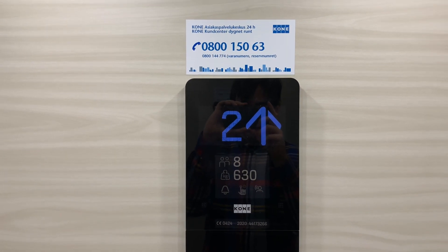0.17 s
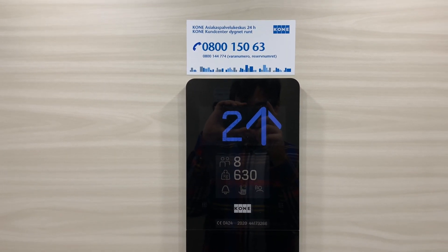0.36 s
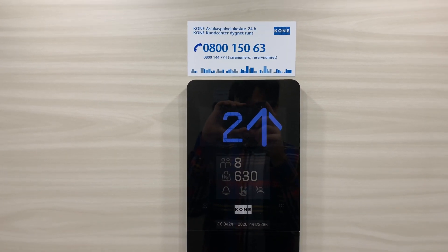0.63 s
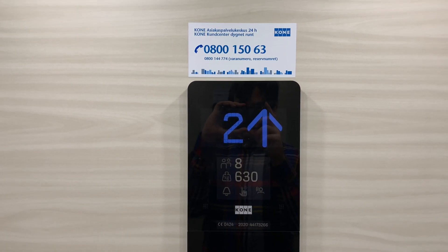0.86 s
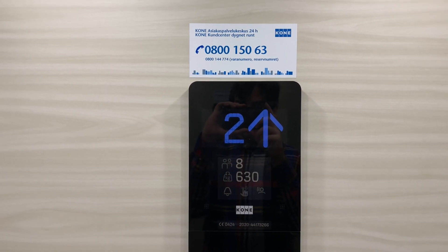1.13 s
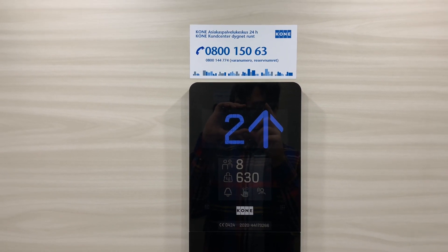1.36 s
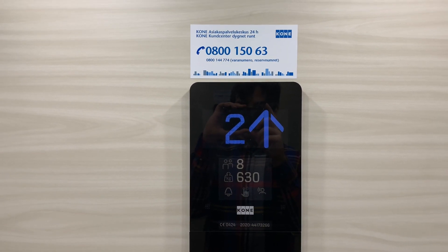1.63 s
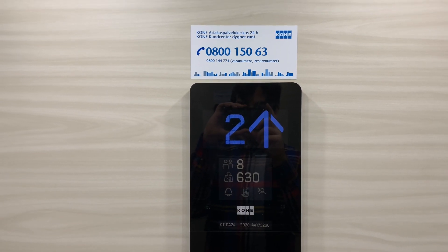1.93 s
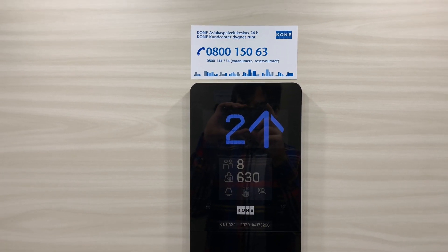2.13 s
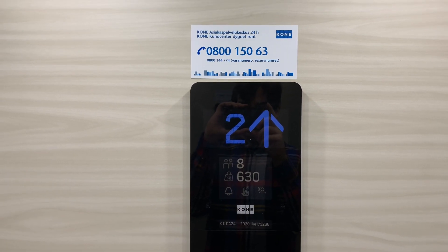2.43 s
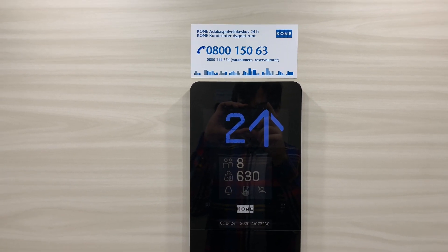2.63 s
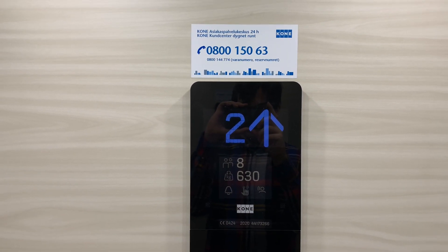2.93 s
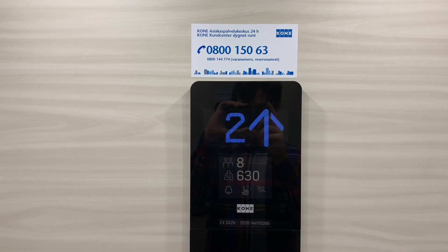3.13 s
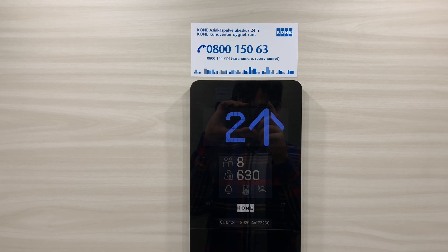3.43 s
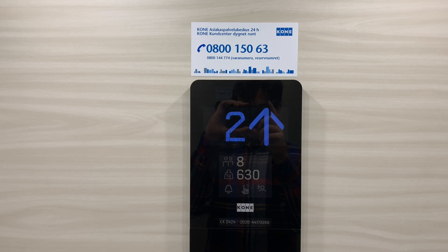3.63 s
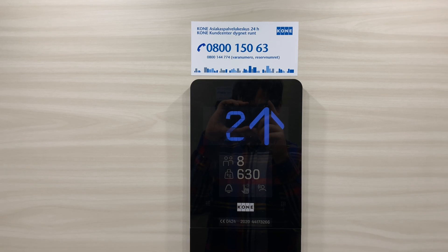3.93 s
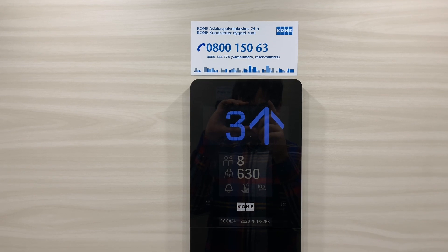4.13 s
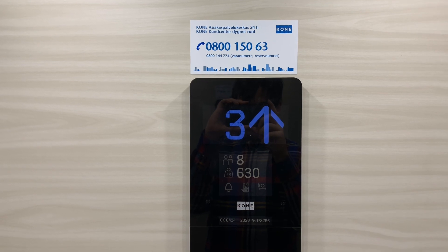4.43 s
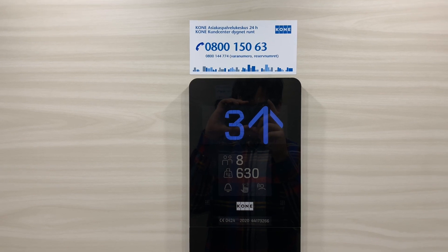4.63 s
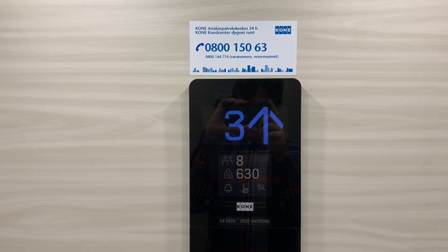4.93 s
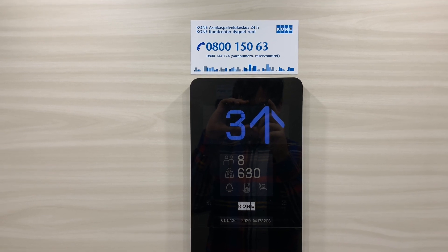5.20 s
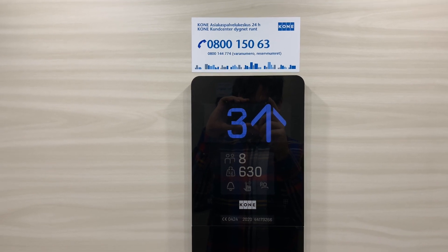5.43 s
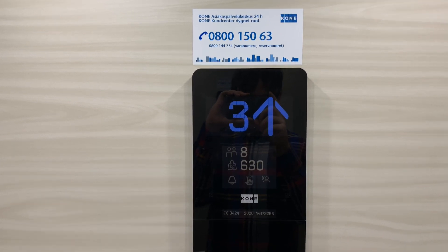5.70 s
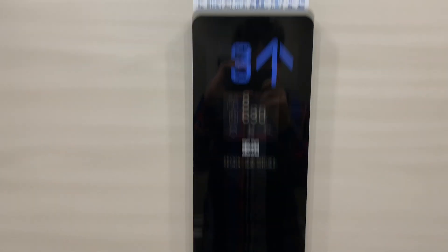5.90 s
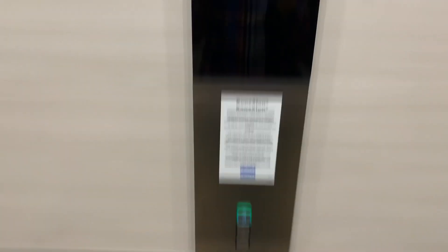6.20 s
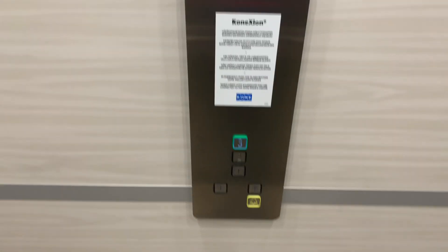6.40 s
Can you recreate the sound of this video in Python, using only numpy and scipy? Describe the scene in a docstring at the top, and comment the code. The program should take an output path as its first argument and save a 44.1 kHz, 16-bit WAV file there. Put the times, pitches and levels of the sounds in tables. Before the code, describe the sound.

Elevator ride heard from within: guide friction with faint whistles gives way to steady motor hum, then sharp switch clicks and muffled knocks.

```python
"""A lift's hoist motor hums through the cabin walls as the car climbs, heard inside at two microphone ports.
The hum, its orders and the drones are wavering sines; rumble, air, ringing panels, a steady hum line and a high
drive whine are shaped noise. For about the first 1.4 seconds a guide scrapes, as friction noise with short
gliding whistles. Brief noise swells make rustles, bumps and click tails; dull knocks are dying modes. Shaft
switches click as the car passes a landing: each is a snap, a ringing housing and dense echoes."""
import sys
import numpy as np
from scipy import signal
from scipy.fft import irfft, next_fast_len
from scipy.io import wavfile
from scipy.ndimage import uniform_filter1d

SR = 44100
rng = np.random.default_rng(int(sys.argv[2]) if len(sys.argv) > 2 else 0)


def generate_wav(signal):
    """Clip the signal to [-1, 1] and save it as 16-bit WAV at the path in sys.argv[1]."""
    frames = np.transpose(np.atleast_2d(signal))
    scaled = np.clip(frames, -1, 1) * 32767
    pcm = np.round(scaled).astype(np.int16)
    wavfile.write(sys.argv[1], SR, pcm)


N = 289296
SIZE, HOP = 2048, 512  # default short-time frame and step, samples

# likeness of the two ports: freq_hz, likeness (-1 opposite to 1 same)
LIKENESS = [(60, .992), (100, .97), (130, .85), (270, .92), (500, .6), (700, .35), (1100, .35),
            (1500, -.45), (1900, -.55), (2400, .3), (3200, .25), (4000, 0), (7000, .2), (8300, -.97),
            (9300, -.95), (10000, .97), (11700, .95), (12700, -.97)]
# lean of the port pair: freq_hz, left_over_right_db
LEAN = [(45, 1), (90, 1.2), (170, .4), (300, 2), (700, 3.5), (1100, 3.5), (1700, 6), (2600, 1), (3300, 1.5),
        (6000, -1.5), (8000, .1)]
# lag of the left port: freq_hz, lag_radians
LAG = [(40, .1), (100, .17), (172, .5), (300, .15), (1000, .25), (1400, 0)]
# modes of rail and cabin frame that colour rumble and scrape: freq_hz, width_hz, peak_db (before scaling)
FRAME_MODES = [(580, 10, 5), (628, 12, 1), (709, 12, 4), (855, 40, 6), (1105, 16, 4), (1590, 40, 2),
               (1832, 29, 4), (2295, 25, 5), (2460, 25, 4), (3077, 30, 3), (3250, 40, 3), (3480, 40, 3),
               (4060, 29, 3)]


def gain_of(db):
    """Amplitude factor of a level in dB."""
    return 10 ** (np.asarray(db) / 20)


def evened(x):
    """A signal scaled to rms 1."""
    return x / np.sqrt(np.mean(x ** 2) + 1e-20)


def read(points, hz):
    """A spectrum table read on a log-frequency axis."""
    f, value = np.transpose(points)
    return np.interp(np.log(hz + 1), np.log(f + 1), value)


def columns(rows, t):
    """Every column of a curve table at the times t."""
    s, *rest = np.transpose(rows)
    return [np.interp(t, s, c) for c in rest]


def grid(size=SIZE, hop=HOP, count=N):
    """Frame times and bin frequencies of short-time spectra."""
    return np.arange(count // hop + 9) * hop / SR, np.fft.rfftfreq(size, 1 / SR)[:, None]


def unit(db, band=True):
    """Gains of a spectrum, scaled to power 1 within a band of each frame."""
    gain = gain_of(db)
    return gain / np.sqrt((gain ** 2 * band).sum(0))


def random_grid(t, hz):
    """Independent random values for every bin and frame."""
    return rng.standard_normal((len(t), len(hz))).T


def smoothed(values, bins, frames):
    """A time-frequency grid averaged over bins and frames, then scaled to rms 1."""
    return evened(uniform_filter1d(uniform_filter1d(values, bins, 0), frames, 1))


def peaks_db(modes, hz):
    """The peaks that a set of modes raises in a spectrum."""
    return sum(db / (1 + (2 * (hz - f) / w) ** 2) for f, w, db in modes)


def apart_at(hz):
    """Phase between the ports, in radians, that gives a sine their likeness."""
    return np.arccos(np.clip(read(LIKENESS, hz), -1, 1))


def ports(left, other, hz):
    """Two partly alike spectra for the two ports, with the lean and lag of the housing."""
    same, lean = np.clip(read(LIKENESS, hz), -1, 1), gain_of(read(LEAN, hz) / 2)
    right = same * left * np.exp(1j * read(LAG, hz)) + np.sqrt(1 - same ** 2) * other
    return np.array([left * lean, right / lean])


def noise(gain, hz, hop=HOP):
    """Diffuse noise from random short-time spectra; a frame of power 1 gives rms 1 before the lean."""
    a, b, c, d = rng.standard_normal((*gain.T.shape, 4)).T
    size = 2 * len(hz) - 2
    spectra = ports(a + 1j * b, c + 1j * d, hz) * gain
    sound = signal.istft(spectra, nperseg=size, noverlap=size - hop)[1][:, :N]
    return sound * np.sqrt(3 * size / 8 / hop)  # makes up for the overlapping windows


def drift(span):
    """Slow chance of rms 1, averaged twice over a span of samples."""
    return evened(uniform_filter1d(uniform_filter1d(rng.standard_normal(N), size=span), size=span))


def tone(hz, db, waver_hz, throb_db, apart=0, span=2500):
    """A sine that follows curves, wavering in pitch and throbbing in level, with the lean and lag of the ports."""
    phase = 2 * np.pi * (np.cumsum(hz + waver_hz * drift(span)) / SR + rng.random())
    lean, lag = gain_of(read(LEAN, np.mean(hz)) / 2), read(LAG, np.mean(hz)) + apart
    level = np.sqrt(2) * gain_of(db + throb_db * drift(span))
    return level * np.array([lean * np.sin(phase - lag), np.sin(phase) / lean])


def motor():
    """Hum orders and rope bounce rise in pitch with the car's speed; wall drones and a buzz keep their own pitch."""
    # swelling levels of the hum and its second and third orders, before the start fade: time_s, level_db
    hum_curve = [(0.8, -35), (0.85, -49), (1.06, -39), (1.1, -28.5), (1.59, -42), (1.83, -32), (1.92, -53),
                 (2.0, -31), (2.07, -39), (2.16, -27.5), (2.31, -45), (2.34, -31.5), (2.95, -26.5),
                 (3.11, -39.5), (3.35, -34.5), (3.61, -42.5), (3.8, -30), (4.04, -30), (4.1, -46),
                 (4.17, -35.5), (4.41, -28), (4.65, -38), (4.68, -32.5), (4.81, -25.5), (4.94, -33.5),
                 (5.37, -26.5), (5.42, -37.5), (5.5, -26), (5.66, -26.5), (5.77, -42.5), (5.93, -30.5),
                 (6.03, -39), (6.38, -36.5), (6.56, -47)]
    second_curve = [(1.0, -51), (1.22, -62), (1.31, -38.5), (1.39, -56.5), (1.54, -42.5), (2.02, -40),
                    (2.16, -35), (2.35, -51), (3.18, -39), (3.31, -38), (3.37, -58), (3.43, -39),
                    (3.51, -48), (3.69, -41.5), (3.83, -47.5), (3.86, -45), (4.48, -44.5), (4.96, -56.5),
                    (5.2, -37), (5.38, -36.5), (5.43, -64.5), (5.68, -35), (5.97, -40.5), (6.13, -56),
                    (6.25, -40.5), (6.56, -54.5)]
    third_curve = [(0.0, -74), (0.05, -61), (1.88, -49.5), (1.92, -55), (2.17, -50), (2.23, -76),
                   (2.37, -42.5), (2.57, -55), (3.89, -59.5), (4.27, -41.5), (4.42, -59.5), (5.02, -47.5),
                   (5.06, -58.5), (6.19, -45.5), (6.21, -43), (6.56, -52)]
    # level of the car bouncing on its ropes: time_s, level_db
    bounce_curve = [(0, -53), (.6, -52), (1.1, -37.5), (1.44, -45), (1.6, -37), (2.4, -35), (2.65, -41),
                    (2.85, -37), (3.4, -36), (4.25, -44), (4.55, -37), (6.2, -43), (6.56, -38.5)]
    # lower wall drone while the car pulls away: time_s, level_db
    low_drone_curve = [(0.0, -40.5), (0.138, -39.5), (0.194, -47), (0.312, -38.5), (0.578, -55), (0.7, -43)]
    # upper wall drone while the car pulls away: time_s, pitch_hz, level_db
    drone_curve = [(0, 99.3, -55), (.16, 96.6, -48), (.24, 98.3, -35.5), (.33, 97.8, -40.5),
                   (.4, 99, -36.5), (.5, 99.1, -48.5), (.66, 90, -40), (.735, 92.2, -67), (.81, 95.8, -31),
                   (.92, 95.5, -59), (1.12, 97.5, -42), (1.35, 98.2, -59), (1.45, 99.6, -36),
                   (1.6, 97.3, -73)]
    # level of the buzz: time_s, level_db
    buzz_curve = [(0.0, -62.5), (0.33, -48), (1.15, -51.5), (1.19, -44.5), (2.1, -52.5), (2.26, -46),
                  (3.12, -60), (3.29, -41), (3.45, -51.5), (3.51, -54.5), (3.74, -43.5), (3.84, -61),
                  (3.93, -48), (4.99, -59), (5.13, -44), (5.39, -53.5), (6.49, -44.5), (6.56, -55)]
    start_speed, cruise_s = .62, 1.05  # share of full speed at the start, time of full speed
    hum_hz, bounce_hz = 86.02, 45.8  # at full speed
    low_drone_hz, buzz_hz = 55, 300.4
    start_db = -27  # the motor is quieter at the starting speed

    t = np.arange(N) / SR
    ramp = np.clip(t / cruise_s, 0, 1)
    speed = start_speed + (1 - start_speed) * ramp

    orders = tone(hum_hz * speed, *columns(hum_curve, t), waver_hz=1.7, throb_db=1.5)
    orders += tone(2 * hum_hz * speed, *columns(second_curve, t), waver_hz=1.8, throb_db=2.5, apart=0.14)
    orders += tone(3 * hum_hz * speed, *columns(third_curve, t), waver_hz=1.193, throb_db=1.5)
    orders *= gain_of(start_db * (1 - ramp))

    bounce = tone(bounce_hz * speed, *columns(bounce_curve, t), waver_hz=.8, throb_db=2.5)
    fade = np.clip(1 - (t - low_drone_curve[-1][0]) / 0.11, 0, 1)
    low_drone = tone(low_drone_hz, *columns(low_drone_curve, t), waver_hz=1.6, throb_db=0.9) * fade
    drone = tone(*columns(drone_curve, t), waver_hz=0.96, throb_db=2.0)
    buzz = tone(buzz_hz, *columns(buzz_curve, t), waver_hz=0.63, throb_db=2.5)
    return orders + bounce + low_drone + drone + buzz


def ringing(modes, count):
    """Steady noise in narrow resonances (freq_hz, width_hz, level_db rms), at both ports."""
    hz = np.fft.rfftfreq(count, 1 / SR)
    a, b, c, d = rng.standard_normal((4, len(hz)))
    power = 0
    for f, width, db in modes:
        shape = 1 / (1 + (2 * (hz - f) / width) ** 2)
        power = power + (gain_of(db) * shape) ** 2 / (shape ** 2).sum()
    return irfft(ports(a + 1j * b, c + 1j * d, hz) * np.sqrt(power), count) * count / 2


def cabin():
    """Wall panels, a steady hum line and the drive's switching whine, as steady noise in narrow resonances."""
    # ringing wall panels, and a steady hum line near 204 Hz: freq_hz, width_hz, level_db (rms)
    panel_and_hum_modes = [(98.7, 14.7, -42), (137.1, 5.5, -52), (204, 7.1, -57), (193, 20, -57),
                           (246.3, 49, -52.5), (323.4, 22, -51.5), (390.8, 19, -54.5)]
    # switching whine of the motor drive: freq_hz, width_hz, level_db (rms)
    whine_modes = [(6496, 32, -73), (12990, 80, -85)]
    return ringing(panel_and_hum_modes + whine_modes, count=next_fast_len(N))[:, :N]


def rumble():
    """Rail rumble and air hiss as shaped noise, in drifting patches of time and pitch."""
    # colour of the rail rumble: freq_hz, relative level_db (per Hz)
    rail_colour = [(25, -21), (38, -6), (70, 1.5), (120, -10), (220, -10), (450, -14.5), (900, -23.5),
                   (1500, -23), (2400, -27), (3200, -39), (5000, -52), (8000, -95.5), (12000, -80.5)]
    # colour of the air hiss: freq_hz, relative level_db (per Hz)
    air_colour = [(2000, 5), (5000, 2), (7500, -1.5), (10000, -7.5), (13000, -9), (15000, -15)]
    # course of the ride: time_s, rumble_db (350-900 Hz), hiss_db (9.7-12.3 kHz), before the patches
    ride_curve = [(0, -54.5, -86), (.36, -50.5, -89.5), (.97, -47, -79), (1.15, -47, -87.5),
                  (1.5, -50, -80.5), (2.05, -50, -82), (2.4, -51, -79), (3.05, -50.5, -78),
                  (3.4, -52.5, -83), (4.18, -48.5, -75.5), (4.5, -50.5, -79.5), (5.1, -49, -77.5),
                  (5.9, -49.5, -78), (6.3, -48.5, -75.5), (6.56, -48, -75.5)]
    t, hz = grid()
    rails_db, air_db = columns(ride_curve, t)
    patches = smoothed(random_grid(t, hz), bins=24, frames=8)
    low, high = (hz > 350) & (hz < 900), (hz > 9700) & (hz < 12300)
    rails = unit(read(rail_colour, hz) + 1.3 * peaks_db(FRAME_MODES, hz), low) * gain_of(rails_db)
    air = unit(read(air_colour, hz), high) * gain_of(air_db)
    return noise(np.hypot(rails, air) * gain_of(1.5 * patches), hz)


def scrape():
    """Guide friction as noise coloured by rail and frame, with one sinking resonance and a quick flutter."""
    # course of the scrape: time_s, level_db (1-2.8 kHz, before flutter), brightness (0-1)
    scrape_curve = [(0, -49.5, 1), (.12, -47, 0.3), (.33, -45.5, .7), (.6, -44, 0.6), (.73, -43, 0.6),
                    (.84, -40, 1), (.96, -42, 0.93), (1.13, -44.5, 0.6), (1.27, -47, 0), (1.33, -47.5, 0.1),
                    (1.365, -48, 0.12)]
    # colour the rail gives: freq_hz, relative level_db (per Hz)
    rail_colour = [(400, 11), (850, 6.5), (1100, 9.5), (2400, 3), (3000, 0), (4200, -6), (7000, -17.5),
                   (9500, -67), (12000, -37)]
    resonance_hz, sink_hz_per_s = 2027, 340
    count = 3 * SR // 2
    t, hz = grid(count=count)

    centre, bright = resonance_hz - sink_hz_per_s * t, columns(scrape_curve, t)[1]
    octaves = np.log2(hz / centre + 1e-9)
    colour = read(rail_colour, hz) + peaks_db(FRAME_MODES, hz)
    colour = colour + 10.1 * np.exp(-(octaves / 0.33) ** 2)
    colour = colour + 9 * (bright - .5) * np.clip(np.log2(hz / 2000 + 1e-9), 0, 2)
    streaks = smoothed(random_grid(t, hz), bins=2, frames=5)  # fine strands that come and go

    flutter = evened(uniform_filter1d(rng.standard_normal(count), 300))
    s = np.arange(count) / SR
    release = np.clip((scrape_curve[-1][0] - s) / 0.022 + 1, 0, 1)  # the guide lets go
    level = gain_of(columns(scrape_curve, s)[0] + 0.2 * flutter) * release
    band = (hz > 1000) & (hz < 2800)
    sound = noise(unit(colour + 3.6 * streaks, band), hz)[:, :count] * level
    return np.pad(sound, [(0, 0), (0, N - count)])


def swell(t, s, length):
    """A quick rise and a slower fall."""
    return np.sin(np.pi * np.clip((t - s) / length, 0, 1) ** 0.54)


def noise_swells():
    """Brief swells of noise around one pitch each: rustles, bumps, a low swell and tails of clicks."""
    # passing swells: start_s, length_s, level_db, centre_hz, width_octaves
    swell_events = [(0, 0.15, -62.5, 6000, 0.53), (1.305, 1.08, -49, 490, 0.34),
                    (1.902, 0.42, -54, 1740, 0.24), (2.142, 0.041, -59, 10000, .8),
                    (2.151, 0.096, -57, 3380, 0.98), (3.83, .08, -52, 1900, .7),
                    (4.315, .07, -46, 1400, 0.7), (4.971, 0.064, -52, 2200, 0.96),
                    (5.012, 0.22, -56.5, 2410, 0.92), (5.055, 0.21, -60.5, 7560, 0.39),
                    (5.93, 0.29, -46.5, 430, 1.36), (5.96, 0.04, -48, 800, 1.2),
                    (6.07, 0.061, -47, 800, 0.89), (6.133, 0.054, -51, 700, 0.72)]
    t, hz = grid(size=512, hop=128)
    power = 0
    for s, length, db, centre, wide in swell_events:
        colour = unit(-6 * (np.log2(hz / centre + 1e-9) / wide) ** 2)
        power = power + (colour * gain_of(db) * swell(t, s, length)) ** 2
    return noise(np.sqrt(power), hz, hop=128)


def sings():
    """Single rail modes sing out as short gliding whistles: sines with a fast waver in pitch and level."""
    # whistles: start_s, length_s, start_hz, end_hz, level_db
    sing_events = [(.03, 0.17, 2280, 2300, -54.5), (0.29, 0.15, 2030, 1800, -52),
                   (.3, 0.49, 675, 695, -51.5), (0.324, 0.24, 2400, 2480, -57),
                   (0.506, 0.055, 1770, 1800, -46), (.56, 0.092, 1820, 1824, -46.5),
                   (0.63, 0.11, 1760, 1740, -45), (0.5, 0.2, 2360, 2280, -52.5),
                   (0.557, 0.15, 4000, 4005, -61), (0.696, 0.26, 1170, 1150, -54),
                   (0.72, 0.28, 850, 847, -46.5), (.77, 0.11, 1580, 1566, -49),
                   (0.68, 0.097, 3050, 3090, -58), (.62, .3, 2500, 2700, -57),
                   (0.059, 0.298, 2200, 2120, -56), (.85, .2, 1600, 2030, -53),
                   (.81, 0.096, 1900, 1800, -51), (1.091, .04, 1800, 1690, -47),
                   (1, 0.027, 1390, 1404, -54), (1.13, 0.037, 1950, 1940, -53),
                   (1.3, 0.064, 1127, 1040, -57), (1.167, 0.039, 1200, 1070, -46),
                   (1.189, 0.027, 1350, 1430, -49), (1.204, .035, 1300, 1200, -47),
                   (1.217, 0.047, 1130, 1070, -47.5), (1.243, 0.031, 1440, 1540, -47),
                   (1.255, 0.038, 1640, 1500, -44), (1.26, 0.085, 1100, 1223, -48),
                   (1.286, .055, 1555, 1625, -46.5)]
    t, out = np.arange(N) / SR, 0
    for s, length, start_hz, end_hz, db in sing_events:
        hz = np.interp(t, [s, s + length], [start_hz, end_hz])
        whistle = tone(hz, db, waver_hz=28, throb_db=4, apart=apart_at(end_hz), span=150)
        out = out + whistle * swell(t, s, length)
    return out


def struck(t, hz, db, t60, rise):
    """One struck mode at both ports: a sine that rises quickly and dies exponentially."""
    u = np.maximum(t, 0)
    level = gain_of(db - 60 * u / t60) * np.minimum(u / rise, 1)
    lean = gain_of(read(LEAN, hz) * np.array([[.5], [-.5]]))
    return level * np.sin(2 * np.pi * hz * u - [[apart_at(hz)], [0]]) * lean


def clack(t, tilt_db, rise, pitch_ratio):
    """Dying modes of the switch, a little different at each blow, struck again by the bouncing contact."""
    # modes before pitch ratio, tilt and chance: freq_hz, relative level_db, t60_s,
    # delay_s (onset of the mode after the blow)
    clack_modes = [(602, -8, 0.08, 0.021), (800, -0.5, .07, 0.002), (1152, -6, 0.11, .028),
                   (1610, -2, .045, .019), (1860, 4, 0.045, 0.003), (2260, 4, 0.05, .006),
                   (2720, -1, .035, .015), (3060, -1, .035, .012), (3470, -3, 0.04, 0.009),
                   (4340, -9, .04, .004)]
    chatter_s, chatter_db = 0.027, -9  # time scale and relative level of the second strike
    out = 0
    for hz, db, t60, delay in clack_modes:
        detune = 0.0057 * rng.standard_normal(2)
        uneven_db = rng.standard_normal(2)
        bounce_s = chatter_s * (.3 + 0.71 * rng.random())
        hz = hz * pitch_ratio
        first_db, again_db = db + .5 * tilt_db * np.log2(hz / 2500) + uneven_db
        again_hz = hz * (1 + 3 * detune[1])
        out = out + struck(t - delay, hz * (1 + detune[0]), first_db, t60, rise)
        out = out + struck(t - delay - bounce_s, again_hz, again_db + chatter_db, .6 * t60, .0015)
    return out


def clicks():
    """A contact snaps, the housing rings; dense echoes of shaft and cabin follow, each band dying at its own speed."""
    # clicks: start_s, level_db (echo rms at the start, before build-up), tilt_db (per octave), rise_s,
    # snap_hz, ring_db (snap and housing against echoes), pitch_ratio (of the ring)
    click_events = [(1.626, -53.5, 0, 0.0034, 2804, 2, 1.0), (3.802, -36.5, 2, 0.00089, 3000, 0.5, 0.98),
                    (4.058, -48, -4, 0.0072, 1750, -6, 0.92),
                    (4.2665, -34.5, -1.5, 0.0011, 2880, 0.5, 0.96),
                    (4.300, -34.5, 1, 0.0024, 2510, -8, 1.04), (4.974, -40, -3, 0.006, 2520, -9, 1)]
    # colour of the switch: freq_hz, relative level_db (per Hz)
    switch_colour = [(300, -16), (700, -9.5), (1100, -5), (2000, 0.5), (3000, -12), (4500, -8.5),
                     (7000, -18), (9000, -33), (15000, -52)]
    # housing modes that colour the echoes: freq_hz, width_hz, peak_db
    housing_modes = [(740, 150, 8), (1930, 110, 4), (2500, 120, 1), (2950, 420, 4), (3590, 320, 6)]
    # echo of shaft and cabin: freq_hz, t60_s
    shaft_decay = [(500, 0.89), (2000, 0.26), (5000, 0.18), (9000, 0.17)]
    snap_db, snap_t60, snap_pair = 7, .018, 1.1  # relative level, shortest decay s, pitch ratio of two modes
    echo_s = .004  # the echoes build up over this time plus the rise

    count = SR // 3
    out, t = np.zeros((2, N + SR)), np.arange(count) / SR
    frame, hz = grid(size=256, hop=32, count=count)
    # the top arrives with the echoes
    late = np.clip(frame / 0.0054, .15, 1) ** np.clip(np.log2(hz / 3000 + 1e-9), 0, 1)
    decay = gain_of(-60 * frame / read(shaft_decay, hz))
    for s, db, tilt_db, rise, snap_hz, ring_db, pitch_ratio in click_events:
        tilt = tilt_db * np.log2(hz / 2500 + 0.091)
        colour = unit(read(switch_colour, hz) + peaks_db(housing_modes, hz) + tilt)
        echoes = noise(colour * late * decay, hz, hop=32)[:, :count]
        echoes = echoes * np.minimum(t / (rise + echo_s), 1)
        snap = sum(struck(t, snap_hz * k, snap_db, snap_t60 + 4 * rise, rise) for k in (1, 1 / snap_pair))
        blow = gain_of(ring_db) * (snap + clack(t, tilt_db, rise, pitch_ratio))
        out[:, round(s * SR):][:, :count] += gain_of(db) * (echoes + blow)
    return out[:, :N]


def knocks():
    """Dull rings that build up over a cycle or more, and quicker rattles of the switch lever, as dying modes."""
    # knocks in the cabin and bumps of a hand: start_s, pitch_hz, peak_db, t60_s
    knock_events = [(2.061, 700, -42, .05), (2.821, 62, -22.5, .3), (4.789, 101, -35, .2),
                    (5.906, 308, -31, .1), (5.962, 800, -42, .2), (5.968, 660, -42, 0.18),
                    (5.985, 403, -35, .12), (6.015, 323, -33, .2), (6.055, 396, -38, .12),
                    (6.072, 900, -41, .12), (6.08, 691, -38, 0.21), (6.078, 375, -32, 0.12),
                    (6.092, 1006, -43, 0.11), (6.102, 263, -27.5, .2), (6.138, 474, -33, 0.13),
                    (6.2, 263, -39, 0.15), (6.222, 269, -32, 0.16)]
    # the switch lever rattling on after a click: start_s, pitch_hz, peak_db, t60_s
    rattle_events = [(4.282, 2900, -39, .04), (4.292, 2600, -36, .04), (4.306, 2400, -33, .04),
                     (4.308, 3600, -37.5, .08), (4.309, 1950, -31, .07), (4.313, 950, -33, .07),
                     (4.322, 1950, -35, .08), (4.332, 1200, -36, .09), (4.347, 1050, -38, .07),
                     (4.981, 1940, -38, .06), (4.986, 3620, -46, .05), (4.983, 1000, -41, .07),
                     (4.995, 1950, -41, .07), (5.008, 1200, -43, .05)]
    t = np.arange(N) / SR
    dull = sum(struck(t - s, hz, db, t60, .004 + 1.2 / hz) for s, hz, db, t60 in knock_events)
    rattles = sum(struck(t - s, hz, db, t60, .002) for s, hz, db, t60 in rattle_events)
    return dull + rattles


def scene():
    """All layers of the ride at the two ports."""
    return motor() + cabin() + rumble() + scrape() + noise_swells() + sings() + clicks() + knocks()


def record(dry):
    """A steep low-pass limits the band of both ports to 15 kHz."""
    edge = signal.firwin(511, 15000, window=("kaiser", 9), fs=SR)
    padded = np.pad(dry, [(0, 0), (255, 255)], "reflect", reflect_type="odd")
    return signal.oaconvolve(padded, edge[None], "valid")


dry = scene()
out = record(dry)
generate_wav(out)
```